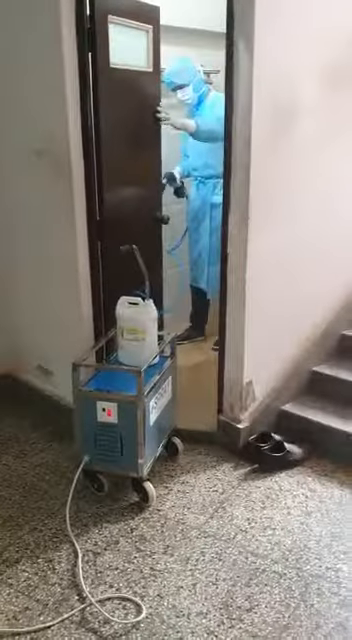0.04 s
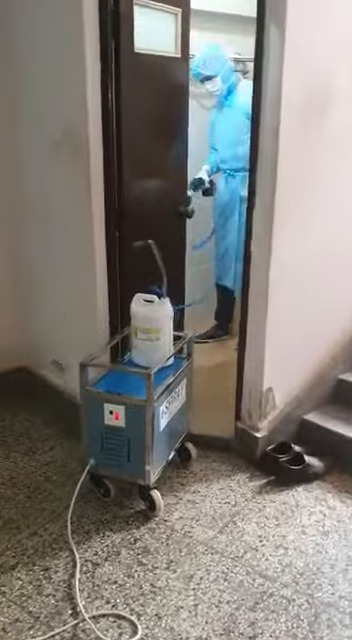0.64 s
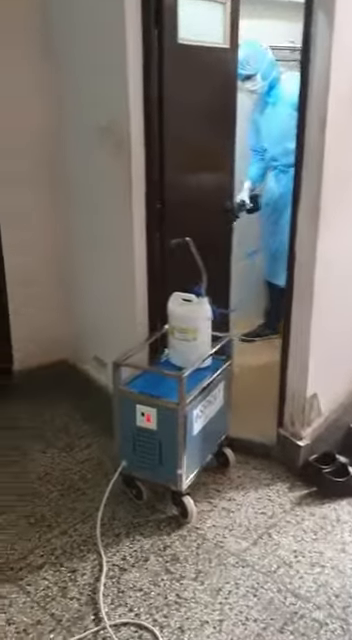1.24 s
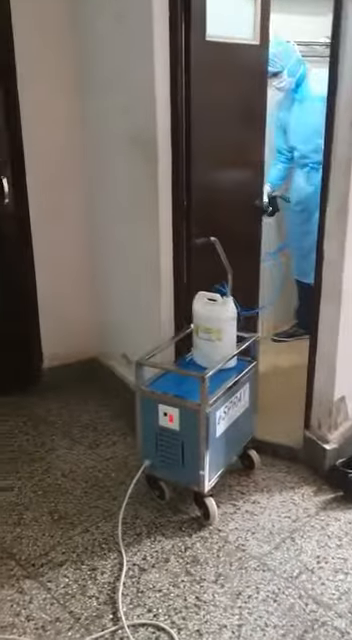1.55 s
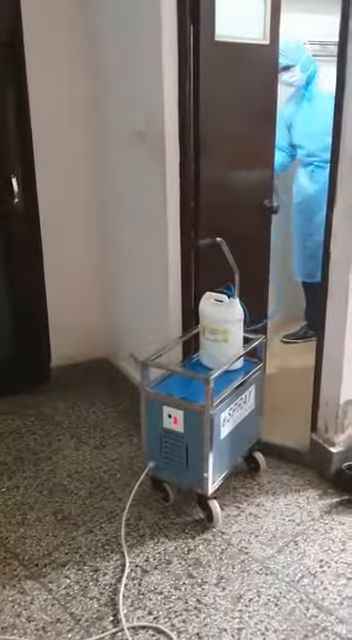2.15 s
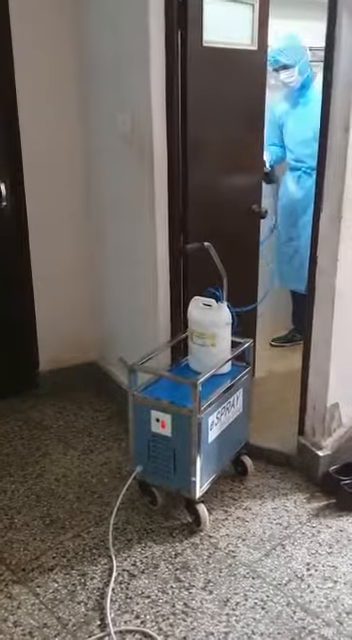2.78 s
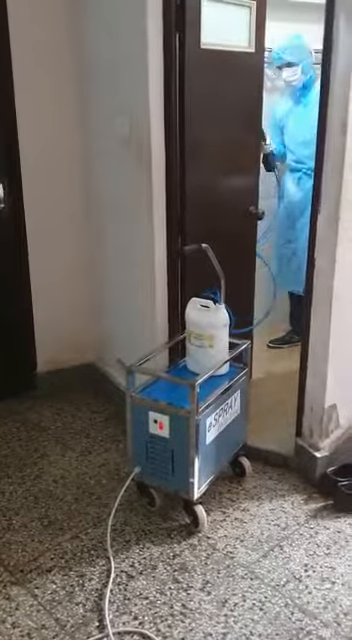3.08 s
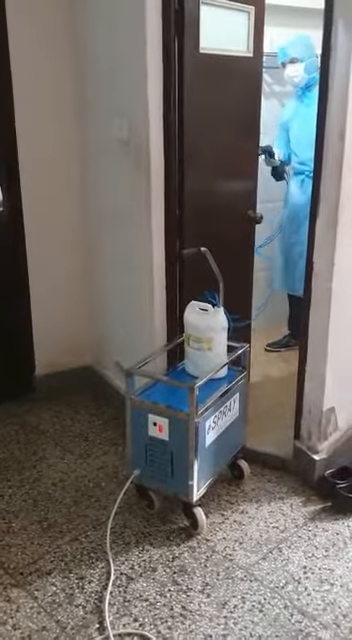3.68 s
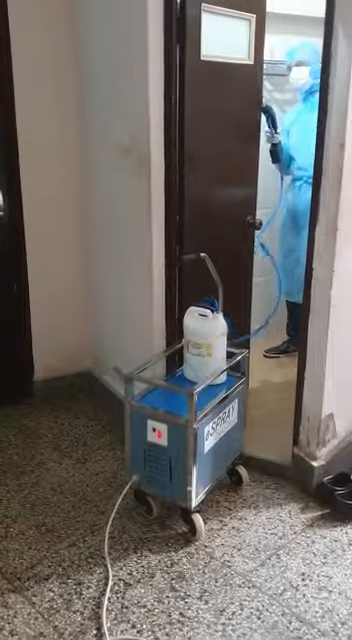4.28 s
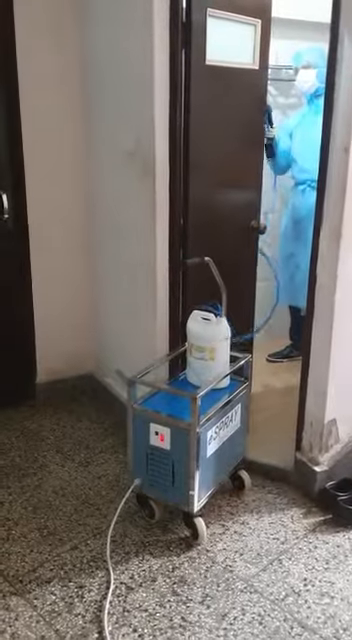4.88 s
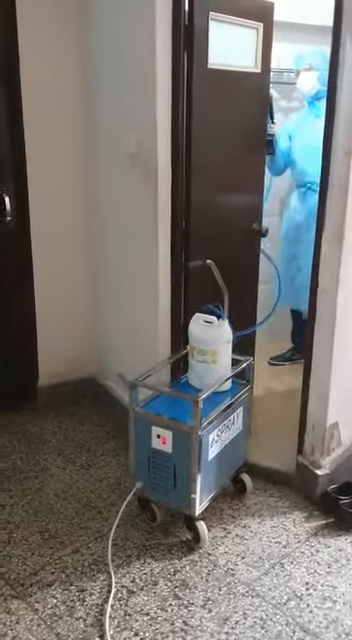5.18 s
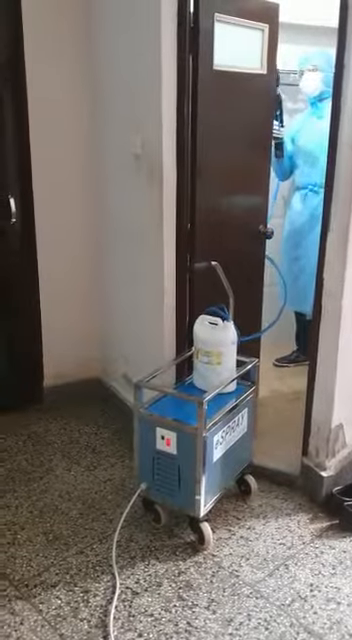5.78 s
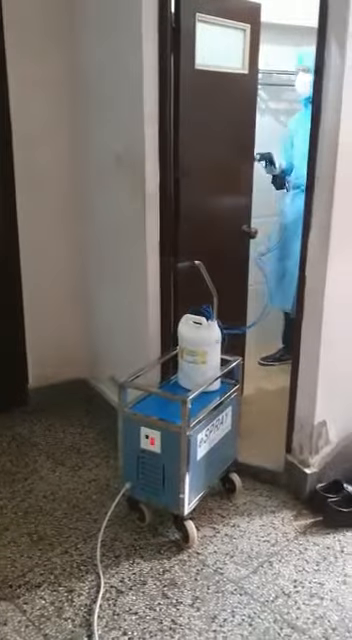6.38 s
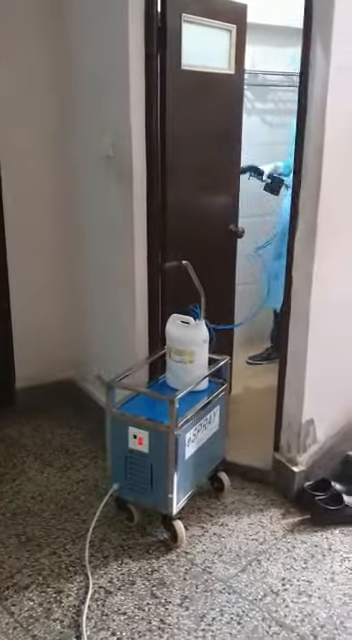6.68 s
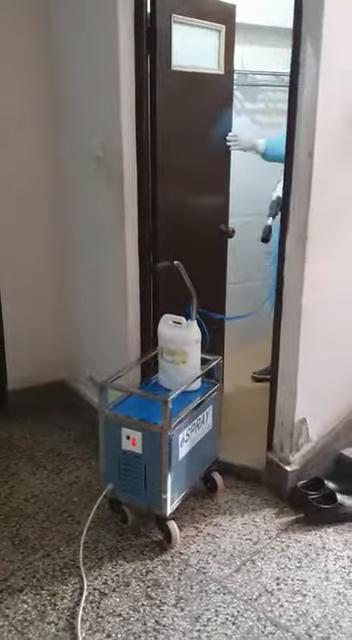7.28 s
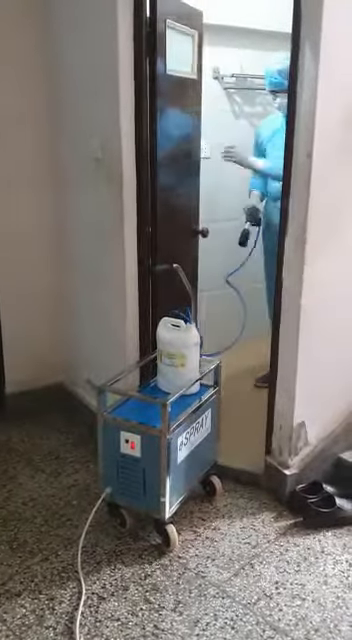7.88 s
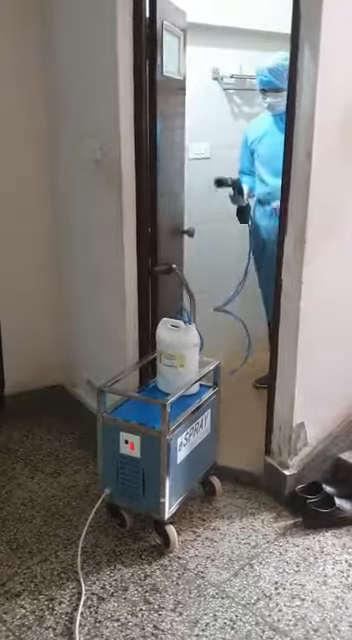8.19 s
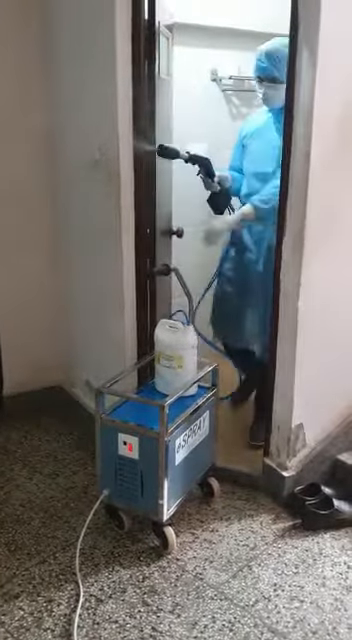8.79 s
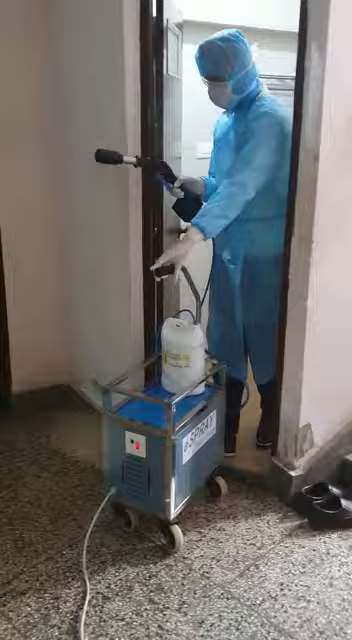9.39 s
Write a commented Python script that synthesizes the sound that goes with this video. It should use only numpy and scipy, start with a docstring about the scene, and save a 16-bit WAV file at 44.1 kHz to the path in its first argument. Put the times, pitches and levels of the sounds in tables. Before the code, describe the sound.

Continuous airy hiss of spraying from the next room, brightening near the end, over the low, rapid throb of a compressor.

```python
"""Disinfectant spraying, heard from the corridor.

A spray gun hisses without pause in a tiled washroom, behind a half-open door; near the end its jet turns
to the doorway and brightens. Out in the stone corridor the twin-piston compressor of its cart throbs,
with clattering valves and a humming motor. A phone with two microphones listens from the corridor."""
import sys
import numpy as np
from scipy import signal
from scipy.fft import rfft, irfft, next_fast_len
from scipy.io import wavfile
from scipy.ndimage import uniform_filter1d

SR = 44100
rng = np.random.default_rng(int(sys.argv[2]) if len(sys.argv) > 2 else 0)


def master_out(mix):
    """Clip the mix to full scale and print it as 16-bit PCM to the path in sys.argv[1]."""
    frames = np.transpose(np.atleast_2d(mix))
    ceiling = np.clip(frames, -1, 1)
    pcm = np.round(ceiling * 32767).astype(np.int16)
    wavfile.write(sys.argv[1], SR, pcm)


N = 416744
SHAFT_HZ = 23.705  # compressor turns per second
FADE_S = 7.27  # from here the cart sinks under the growing hiss
HIDDEN_DB = -30  # the jet's level curve sits near this while the door screens the gun


def undb(db):
    """Decibels to gain."""
    return 10 ** (np.asarray(db) / 20)


def unit(pair):
    """Scale a left-right pair so that its middle has rms 1."""
    return pair / np.std(pair.mean(axis=0))


def since(start_s):
    """Seconds gone by since a moment, zero before it."""
    return np.maximum(np.arange(N) / SR - start_s, 0)


def swell(top_s, length_s):
    """A smooth rise from 0 to 1 and back, centred on top_s."""
    t = np.arange(N) / SR
    return np.cos(np.pi * np.clip((t - top_s) / length_s, -.5, .5)) ** 2


def walk(rate_hz):
    """Random drift of spread 1: levels held for 1 / rate_hz seconds and smoothed twice."""
    hold = int(SR / rate_hz)
    held = np.repeat(rng.standard_normal(N // hold + 1), hold)
    slow = uniform_filter1d(uniform_filter1d(held, hold), hold)[:N]
    return slow / np.std(slow)


def shape(x, response):
    """Filter by a gain that is a function of frequency."""
    size = next_fast_len(N, True)
    hz = np.maximum(np.arange(size // 2 + 1) * SR / size, 1)
    return irfft(rfft(x, size) * response(hz), size)[..., :N]


def band(x, centre_hz, half_width_hz):
    """Pass one flat-topped band."""
    return shape(x, lambda hz: 1 / (1 + ((hz - centre_hz) / half_width_hz) ** 4))


def gain_at(hz, points):
    """Gain along a curve of (frequency [Hz], level [dB]) points."""
    point_hz, db = np.transpose(points)
    return undb(np.interp(np.log(hz), np.log(point_hz), db))


def colour(x, points):
    """Filter by such a curve, falling 12 dB an octave above its last point."""
    return shape(x, lambda hz: gain_at(hz, points) * np.minimum(points[-1][0] / hz, 1) ** 2)


def corridor(pair):
    """Two unrelated signals reach the microphones as left and right: alike in the bass, apart on top."""
    # stereo width of the cart: (frequency [Hz], side relative to mid [dB])
    width = [(50, -5), (120, -13.5), (200, -9.5), (400, -8), (700, -8.5), (1200, 0)]
    side = shape(pair[1], lambda hz: gain_at(hz, width))
    return np.array([pair[0] + side, pair[0] - side])


def tones(phases, levels_db, waver_db):
    """Tones that the corridor scatters in phase, wavering in level as the phone moves."""
    pair = sum(undb(db + waver_db * walk(2.004)) * np.cos(2 * np.pi * (cycles + rng.random((2, 1))))
               for cycles, db in zip(phases, levels_db))
    return np.sqrt(2) * corridor(pair)


def corridor_boom(gain_db=-16, fade_db_per_s=1):
    """A low resonance of the corridor booms irregularly, the same at both microphones."""
    # swells of the boom: (time of the top [s], length [s], rise [dB])
    booms = [(0.55, 2.4, 5), (6.0, 3.8, 5.5)]
    rise_db = sum(db * swell(top_s, length_s) for top_s, length_s, db in booms)
    boom = band(rng.standard_normal(N), centre_hz=59, half_width_hz=14)
    return undb(gain_db + rise_db - fade_db_per_s * since(FADE_S)) * boom / np.std(boom)


def corridor_hollow(gain_db=-18.5):
    """At first the phone stands in a resonance of the corridor, and the cart sounds hollower."""
    ring = band(rng.standard_normal((2, N)), centre_hz=295, half_width_hz=45)
    return undb(gain_db) * swell(top_s=1.47, length_s=4) * unit(corridor(ring))


def motor_hum(gain_db=-1):
    """Motor and fan hum out of step with the pistons and beat against the throb."""
    # tones of the motor iron and its cooling fan: (frequency [Hz], level [dB])
    hum = [(100, -16.5), (123.3, -14), (147, -16), (161, -26), (194.5, -16.5), (200, -26), (242, -21.5),
           (294.7, -25.5), (457, -29.5), (574, -29.5), (593, -35), (740, -32), (782, -32)]
    hz, db = np.transpose(hum)
    return tones((f * np.arange(N) / SR for f in hz), db + gain_db, waver_db=2.5)


def motor_whine(turns, multiple=37, gain_db=-56.5):
    """A thin, even whine of the motor, locked to the shaft."""
    return tones([multiple * turns], [gain_db], waver_db=.6)


def intake(turns, gain_db=-11, gulp_depth=0.17):
    """Turbulent air, drawn in a gulp at every stroke."""
    # air churning in intake and cabinet: (frequency [Hz], spectral level [dB])
    churn_colour = [(20, -27), (45, -24), (80, -2.5), (120, -2), (165, -5), (215, -2.5), (300, -8.5),
                    (520, -8.5), (700, -13.5), (1000, -16), (2000, -21)]
    gulps = 1 + gulp_depth * np.cos(4 * np.pi * turns)
    churn = colour(rng.standard_normal((2, N)) * gulps, churn_colour)
    return undb(gain_db) * unit(corridor(churn))


def valves(turns, gain_db=-23, ring_s=0.038, uneven_db=3.0):
    """The same metallic clatter comes round on every turn, fading after each of the two strokes."""
    # clatter of the valves: (frequency [Hz], spectral level [dB])
    valve_colour = [(500, -5.5), (750, -6), (1100, -8), (1700, -7), (2200, -16), (2300, 0), (2440, 2),
                    (2520, -30), (3500, -30)]
    size = int(SR / SHAFT_HZ)
    age_s = np.arange(size) % (size / 2) / SR
    one_turn = rng.standard_normal((2, size)) * np.exp(-age_s / ring_s)
    clatter = np.array([np.interp(turns % 1 * size, np.arange(size), row) for row in one_turn])
    return unit(corridor(colour(clatter, valve_colour))) * undb(gain_db + uneven_db * walk(47))


def cabinet(turns, gain_db=-1.0):
    """The panels buzz and the cylinder head sings in step with the shaft."""
    # drone of the steel cabinet: (multiple of the shaft speed, level [dB])
    drone = [(13, -26.5), (14, -23), (15, -23), (16, -26.5), (17, -27.5), (18, -26), (19, -34), (20, -25.5),
             (22, -25), (23, -25.5), (24, -29.5), (26, -25), (27, -38), (28, -30), (29, -31.5), (30, -31.5),
             (34, -28), (35, -34), (38, -31), (39, -31.5), (40, -32.5), (43, -34)]
    # ring of the cylinder head: (multiple of the shaft speed, level [dB])
    head = [(95, -27.5), (97, -27), (98, -29), (99, -24.5), (101, -33), (102, -25.5), (103, -29)]
    multiples, db = np.transpose(drone + head)
    return tones((k * turns for k in multiples), db + gain_db, waver_db=1.4)


def knocks(turns, gain_db=-17, sharpness=1.4):
    """Every stroke thumps the cabinet softly, never twice alike."""
    push = np.exp(sharpness * np.cos(4 * np.pi * turns))
    thump = band(rng.standard_normal(N) * push, centre_hz=136, half_width_hz=34)
    return undb(gain_db) * thump / np.std(thump)


def pistons(turns, gain_db=-2.0, unsteady_db=0.57, skew_rad=0.94, limp_rad=1.47):
    """Two strokes a turn, each a push of air and then a suck; they limp, a short gap then a long one."""
    # throb, its odd multiples due to unequal pistons: (multiple of the shaft speed, level [dB])
    throb = [(2, -12.5), (4, -1.5), (5, -45), (6, -7), (7, -9), (8, -12), (9, -29.5), (10, -24.5),
             (11, -16)]
    wave = sum(undb(db) * np.cos(2 * np.pi * k * turns + skew_rad + limp_rad * (k % 2))
               for k, db in throb)
    return np.sqrt(2) * wave * undb(gain_db + unsteady_db * walk(47))


def compressor(gain_db=-28.5, swell_db=1, fade_db_per_s=1.4, wander_turns=0.0039):
    """The cart, in the corridor with the microphones: one nearly steady shaft drives its strokes."""
    turns = SHAFT_HZ * np.arange(N) / SR + wander_turns * walk(1.5)
    machine = pistons(turns) + knocks(turns) + cabinet(turns) + valves(turns) + intake(turns)
    cart = machine + motor_hum() + corridor_boom() + corridor_hollow()
    drift_db = swell_db * swell(top_s=3.2, length_s=3.2) - fade_db_per_s * since(FADE_S)
    return cart * undb(gain_db + drift_db) + motor_whine(turns)


def midrange_swells():
    """Soft, hollow swells of midrange noise."""
    # swells of noise: (time of the top [s], length [s], band centre [Hz], level [dB])
    swells = [(0.2, 2.8, 1500, -48.5), (6.3, 2.7, 716, -51.5), (8.3, 0.9, 1500, -52)]
    out = 0
    for top_s, length_s, centre_hz, db in swells:
        rush = band(rng.standard_normal((2, N)), centre_hz, half_width_hz=centre_hz / 4)
        out = out + undb(db) * swell(top_s, length_s) * unit(rush)
    return out


def notched_response(size, decay_s=0.01, peak_limit=1.5):
    """Fine notches between low, even peaks; as they shift, the hiss takes a slightly swirling colour."""
    spectrum = rfft(rng.standard_normal((2, size)) * np.exp(-np.arange(size) / SR / decay_s))
    strength = np.abs(spectrum) / np.sqrt(np.mean(np.abs(spectrum) ** 2))
    response = irfft(spectrum / np.maximum(strength / peak_limit, 1), size)
    return response / np.linalg.norm(response, axis=1, keepdims=True)


def early_reflections(direct, moves=36, echo_samples=1600):
    """Each place of the gun has its own early echoes; the hand glides from one to the next."""
    step = N // moves + 1
    source = np.pad(direct, ((0, 0), (step, 2 * step)))
    early = np.zeros((2, source.shape[1] + echo_samples))
    crossfade = signal.windows.cosine(2 * step)
    for start in np.arange(moves + 1) * step:
        piece = crossfade * source[:, start:start + 2 * step]
        echoed = signal.fftconvolve(piece, notched_response(echo_samples), axes=1)
        early[:, start:start + echoed.shape[1]] += echoed
    return early[:, step:step + N]


def jet_air(exposure_db, direct_db=-10.5, early_db=0.5, right_lag_samples=19):
    """Jet noise reaches the microphones directly, by early echoes, and as a diffuse wash."""
    jet = rng.standard_normal(N)
    direct = np.array([jet, np.roll(jet, right_lag_samples)])
    short_paths = undb(direct_db) * direct + undb(early_db) * early_reflections(direct)
    diffuse = rng.standard_normal((2, N))
    presence = undb(exposure_db / 2)  # grows as the door screens the gun less
    power = 1 + presence ** 2 * (undb(direct_db) ** 2 + undb(early_db) ** 2)
    return (diffuse + presence * short_paths) / np.sqrt(power)


def sibilance(air, level_db, db_per_db=0.22):
    """The nozzle's resonance stands out more as the gun comes into the open."""
    ring = band(air, centre_hz=6360, half_width_hz=370)
    return (undb(db_per_db * (level_db - HIDDEN_DB)) - 1) * ring


def doorway_flare(beam, above_hz=11000, turn_s=6.88, swing_s=0.15, flare_db=3, flare_s=0.52, rest_db=0.3):
    """The top treble, the narrowest beam, flares as the nozzle swings to the doorway, then settles."""
    age_s = since(turn_s)
    lift_db = np.minimum(age_s / swing_s, 1) * (rest_db + flare_db * np.exp(-(age_s / flare_s) ** 2))
    return (undb(lift_db) - 1) * shape(beam, lambda hz: 1 / (1 + (above_hz / hz) ** 20))


def aim(sway_db=0.55, wobble_db=0.35, rush_share=0.38, clear_s=8.06, climb_db_per_s=3, climb_db=1.3):
    """An unsteady hand points the gun: this sets its level and, relative to that, rush and beam [dB]."""
    # the jet as the gun moves behind the door and the door then opens: (time [s], level [dB])
    jet_levels = [(0.0, -29.5), (0.25, -31.5), (0.45, -29.3), (1.0, -31), (1.4, -32), (2.05, -32),
                  (2.4, -31), (2.87, -32), (3.15, -31.5), (3.38, -30), (3.78, -30), (4.15, -30.5),
                  (4.32, -31), (4.5, -30), (4.92, -31.8), (5.05, -30.5), (5.5, -30.5), (5.87, -29.5),
                  (6.55, -31), (6.93, -30.5), (7.35, -29), (7.68, -27), (8.05, -27.5), (8.38, -27.5),
                  (8.48, -28.2), (8.8, -26), (9.1, -27.5), (9.45, -26)]
    # close sweeps over wall or door: (time when closest [s], length [s], rush [dB], treble [dB])
    sweeps = [(0.6, 0.65, 2.5, 0.2), (1.054, 0.62, 3.5, 1.5), (1.61, 1, 3, 0.5), (2.938, 0.6, 2, 0.5),
              (3.98, 0.41, 2.2, -0.5), (4.335, 0.27, 4.9, 4.1), (6.596, 0.9, 2, -0.5),
              (7.09, 0.51, 2.5, 0.5), (7.438, 0.6, 3, 0.5), (7.93, 0.24, 2, -0.5), (8.12, 0.22, 1.5, 0),
              (8.89, 0.18, 1.5, 1.2)]
    level_db = np.interp(np.arange(N) / SR, *np.transpose(jet_levels))
    # the lows bend round the door, so the rush follows only a share of each change in level
    rush_db = (rush_share - 1) * (level_db - HIDDEN_DB) + sway_db * walk(15)
    # with the door out of the way, the treble climbs and stays
    beam_db = np.minimum(climb_db_per_s * since(clear_s), climb_db)
    for top_s, length_s, rush_rise_db, treble_rise_db in sweeps:
        closeness = swell(top_s, length_s)
        rush_db += rush_rise_db * closeness
        beam_db += treble_rise_db * closeness
    return level_db + wobble_db * walk(11), rush_db, beam_db


def spray(rush_below_hz=4500, beam_above_hz=7700, flutter_db=0.3):
    """A room away, the jet rushes on surfaces, hisses in the room and beams treble where it points."""
    # the spray as heard from the corridor: (frequency [Hz], spectral level [dB])
    jet_colour = [(500, -14), (1100, -14.5), (2000, -9), (2600, -5.5), (3000, -3), (3350, -2), (3900, -3),
                  (4700, -0.5), (5700, 1.7), (6450, 2.6), (6950, 1.5), (7450, -2), (8600, 0), (10400, -1.3),
                  (11400, -0.9), (13700, -4), (15800, -6.5)]
    level_db, rush_db, beam_db = aim()
    air = colour(jet_air(level_db - np.median(level_db)), jet_colour)
    rush = shape(air, lambda hz: 1 / (1 + (hz / rush_below_hz) ** 20))
    beam = shape(air, lambda hz: 1 / (1 + (beam_above_hz / hz) ** 20))
    hiss = air - rush - beam + sibilance(air, level_db)
    # (signal, gain [dB], left over right [dB])
    parts = [(rush, rush_db - 5.5, -2.0),
             (hiss, -0.17, 1.5),
             (beam + doorway_flare(beam), beam_db + 1.5, 1.8)]
    sides = np.array([[.5], [-.5]])
    out = sum(unit(part) * undb(db + flutter_db * walk(28) + pan_db * sides)
              for part, db, pan_db in parts)
    return out * undb(level_db)


def scene():
    """The gun behind the door and its cart in the corridor."""
    return spray() + midrange_swells() + compressor()


def record(dry):
    """The sound is cut off steeply above 15.7 kHz."""
    return signal.sosfilt(signal.ellip(12, .1, 80, 15700, fs=SR, output="sos"), dry)


dry = scene()
out = record(dry)
master_out(out)
```